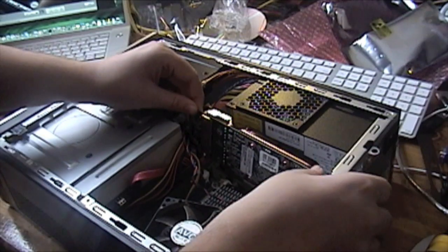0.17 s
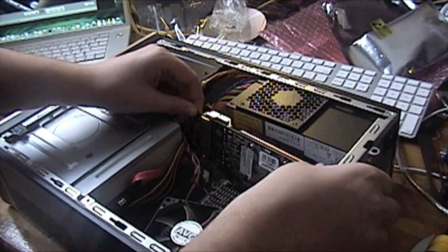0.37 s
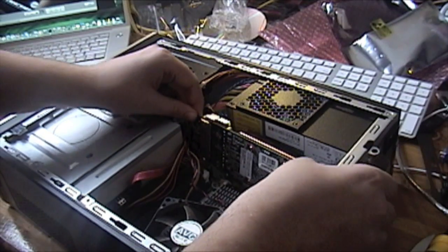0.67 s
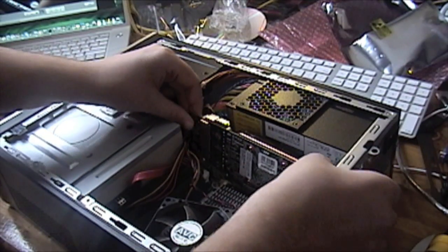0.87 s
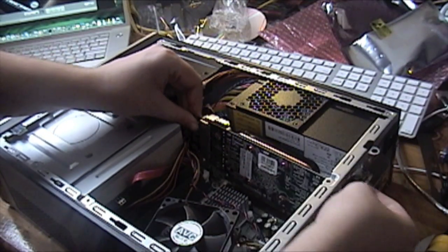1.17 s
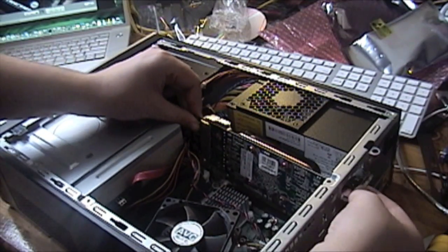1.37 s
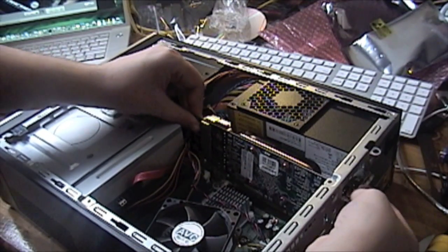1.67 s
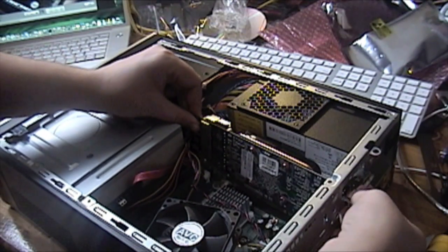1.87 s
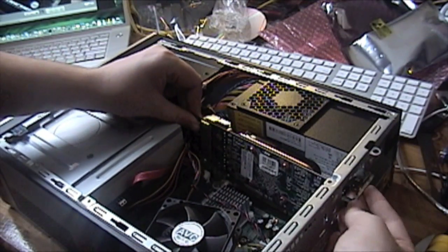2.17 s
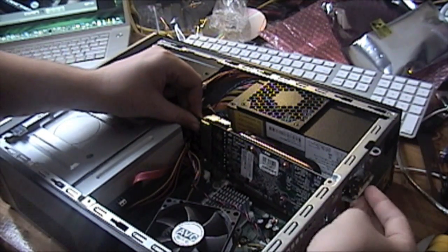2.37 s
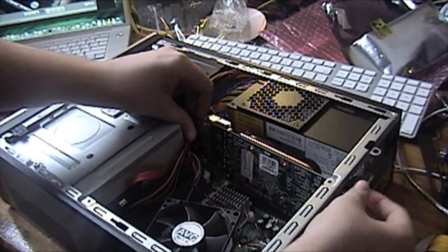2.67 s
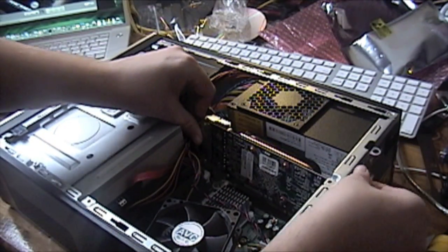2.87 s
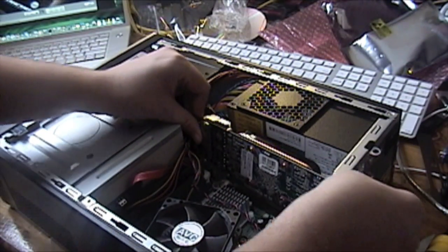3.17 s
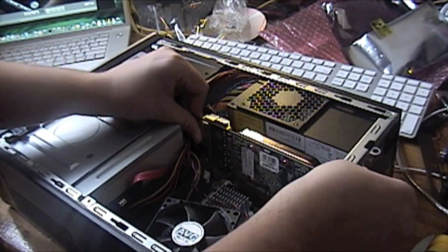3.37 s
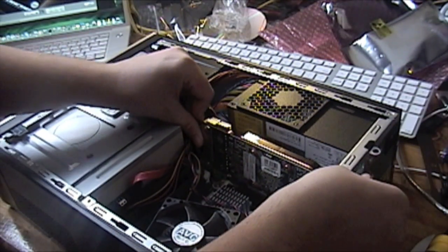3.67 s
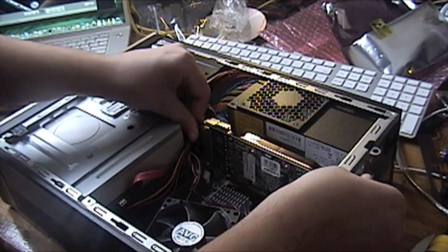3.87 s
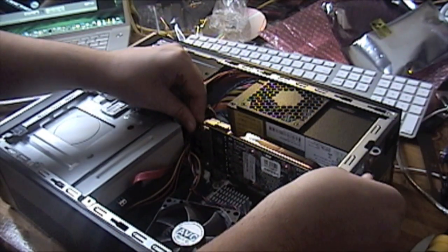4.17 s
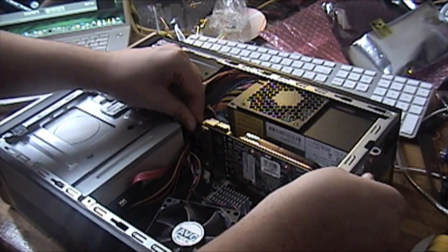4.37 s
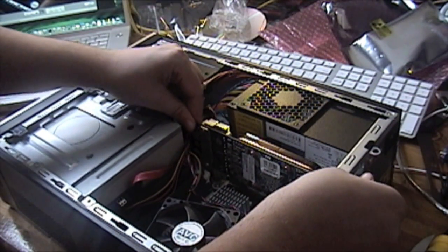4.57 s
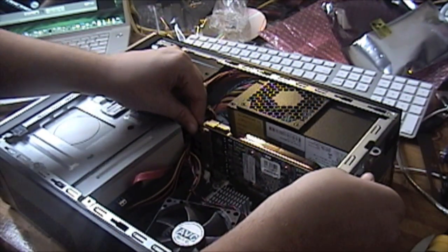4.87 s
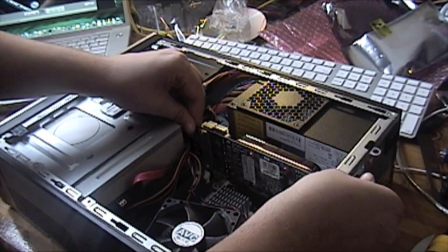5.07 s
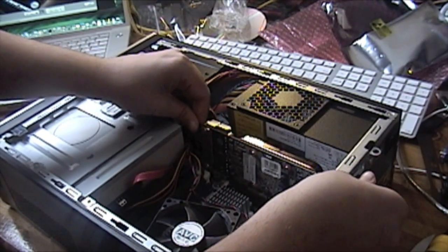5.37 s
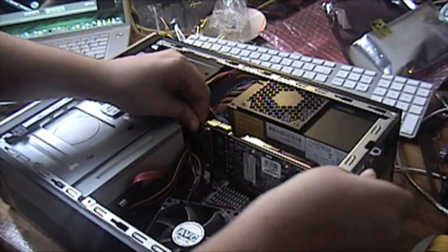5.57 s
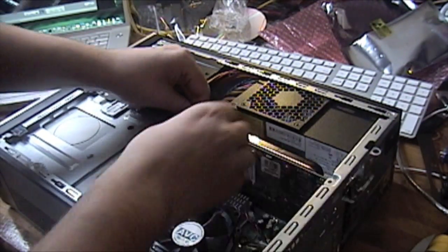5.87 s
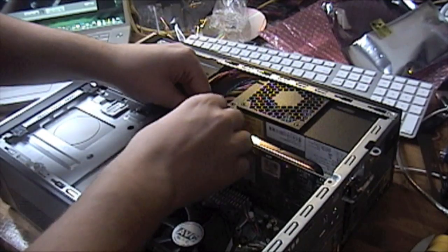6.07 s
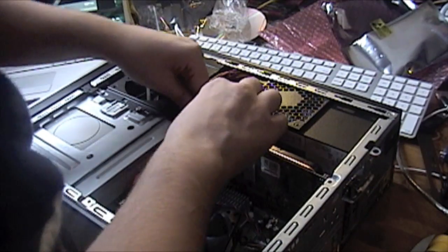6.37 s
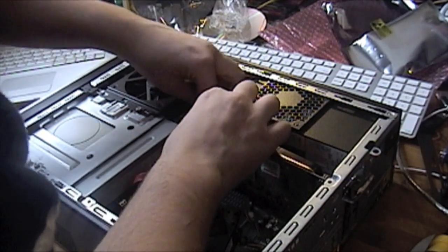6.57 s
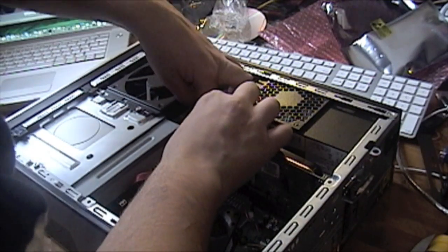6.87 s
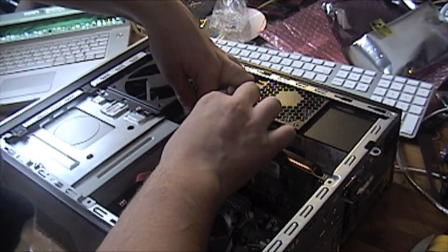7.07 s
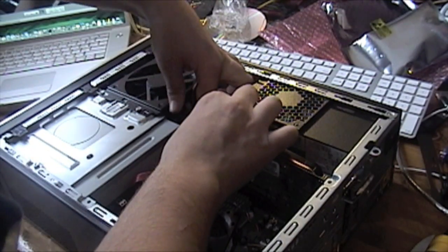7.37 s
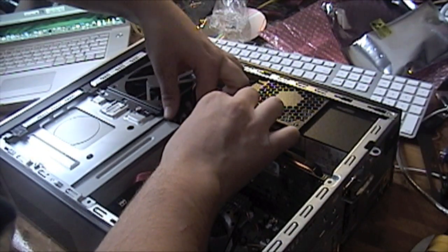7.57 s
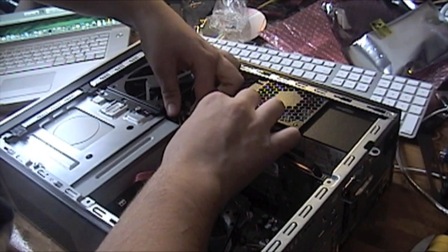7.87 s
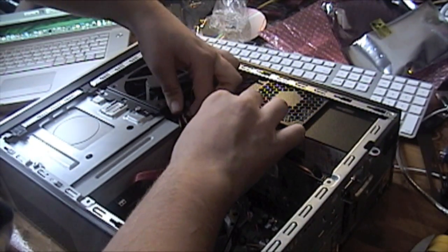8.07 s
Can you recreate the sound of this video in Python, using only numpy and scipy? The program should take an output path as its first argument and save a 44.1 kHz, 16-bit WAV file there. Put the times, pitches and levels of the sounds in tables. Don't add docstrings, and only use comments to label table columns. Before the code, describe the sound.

A low, slightly wavering ventilation drone with a soft fan tone, light hiss and a very thin high whine runs throughout, in a small room. Hands work close by in an open steel computer case. A crisp click and scrape come at 0.1 s, then sparse quiet ticks and short rubs, with a knock and low thud near 1.35 s and a scrape at 1.7 s. It is quieter from 2 to 3 s. A click at 3.0 s leads to the loudest moment, 3.25-3.4 s: hard, bright snaps and clanking steel, followed by smaller knocks and dull thuds until 3.9 s. Faint ticks fill 4-4.8 s. Scrapes and clicks resume from 4.9 to 5.7 s. From 6.1 to 6.8 s come firmer knocks, scrapes and hollow case thumps, then soft cable rubbing, a tick near 7.55 s, and a last light knock at 8.17 s.

```python
import sys
import numpy as np
from scipy import signal
from scipy.fft import rfft, irfft, next_fast_len
from scipy.io import wavfile
from scipy.ndimage import uniform_filter1d, map_coordinates

SR = 44100
rng = np.random.default_rng(int(sys.argv[2]) if len(sys.argv) > 2 else 0)


def decibels_to_gain(level_db):
    exponent = np.asarray(level_db, float) / 20
    return 10 ** exponent


def pcm_store(signal):
    levels = np.round(np.clip(np.atleast_2d(signal), -1, 1) * 32767)
    wavfile.write(sys.argv[1], SR, levels.astype(np.int16).T)


N = 362502

# freq_hz, density_db (per Hz)
AIR_SPECTRUM = [(15, -55.5), (25, -27), (134, -6.5), (217, -17.5), (427, -22), (503, -26.5), (560, -25),
                (1160, -29.5), (1610, -26), (7310, -39), (8140, -39), (9070, -39), (16000, -46.5)]
# freq_hz, width_hz, level_db
EDGE_MODES = [(5700, 3700, -5), (8740, 374, 4), (9250, 3500, -2.5), (13180, 4100, -6.5)]
# freq_hz, width_hz, level_db
PANEL_MODES = [(288, 52, 0), (450, 14.5, 4.5), (575.4, 22, 3.5), (680.5, 7.4, -1.5), (741, 3.8, -3.5),
               (870, 63, 2), (925, 355, -3.5), (1180, 120, -11.5), (1276, 46, -20)]
# freq_hz, width_hz, level_db
CARD_MODES = [(1890, 400, -8), (2030, 220, -6), (2670, 90, -12), (2880, 90, -6), (3330, 370, -7),
              (3540, 270, -15), (4710, 150, -10), (5650, 1500, -12)]


def unit(x):
    return x / np.sqrt(np.mean(x ** 2) + 1e-20)


def along(points, hz):
    f, v = np.transpose(points)
    return np.interp(np.log(hz + 1), np.log(f + 1), v)


def curves(rows):
    s, *cols = np.transpose(rows)
    return [np.interp(np.arange(N) / SR, s, c) for c in cols]


def filtered(x, response):
    m = next_fast_len(x.shape[-1] + 4096)
    spectrum = rfft(x, m) * response(np.fft.rfftfreq(m, 1 / SR))
    return irfft(spectrum, m)[..., :x.shape[-1]]


def resonant(modes, scatter_db=0):
    gains = decibels_to_gain(scatter_db * rng.standard_normal(len(modes)))

    def response(f):
        total = 0
        for k, (centre, width, db) in enumerate(modes):
            mode = 1j * f * width / (centre * centre - f * f + 1j * f * width)
            total = total + (-1) ** k * gains[k] * decibels_to_gain(db) * mode
        return total

    return response


def near(modes, hz, octaves):
    return [(c, w, db - 6 * (np.log2(c / hz) / octaves) ** 2) for c, w, db in modes]


def add(track, s, sound):
    part = track[:, round(s * SR):][:, :sound.shape[1]]
    part += sound[:, :part.shape[1]]


def rush(colour, patchy_db):
    # freq_hz, correlation (-1 to 1)
    likeness = [(60, 0.5), (130, 0.88), (290, 0.53), (640, -0.14), (1410, -0.49), (3100, -0.38),
                (6820, -0.13), (15000, 0.85)]
    z = signal.stft(rng.standard_normal((2, N)), nperseg=512)[2]
    patches = uniform_filter1d(rng.standard_normal(z.shape[1:]), 6, 0)
    patches = uniform_filter1d(patches, 14, 1)
    pair = signal.istft(z * decibels_to_gain(patchy_db * unit(patches)), nperseg=512)[1][:, :N]

    def mid_side(hz):
        angle = np.arccos(np.clip(along(likeness, hz), -1, 1)) / 2
        return colour(hz) * [np.cos(angle), np.sin(angle)]

    mid, side = filtered(pair, mid_side)
    return np.array([mid + side, mid - side])


def ventilation():
    # freq_hz, width_hz, level_db
    room_modes = [(36, 7, -24), (45, 5, -22), (59, 9.7, -3), (72, 2.7, -34), (83.8, 10, -6.5),
                  (115, 3.9, -0.5), (126.66, 3.2, 8.5), (141.8, 12.4, 4), (188, 10.8, -1), (269.7, 37, -10),
                  (313.5, 17.4, -2.5), (442, 140, -14.5)]
    # time_s, drone_db, air_db
    levels = [(0.0, -49, -56.5), (2.5, -50, -52.5), (2.7, -50, -56.5), (3.02, -49.5, -56),
              (3.75, -47.5, -56), (4.19, -49.5, -56.5), (7.05, -48.5, -54.5), (7.45, -51, -54),
              (7.62, -47.5, -54.5), (8.22, -48, -56.5)]
    drone_db, air_db = curves(levels)
    drone = unit(rush(resonant(room_modes), patchy_db=1.5))

    def low_band(hz):
        return decibels_to_gain(along(AIR_SPECTRUM, hz)) / (1 + (hz / 1500) ** 4) / (1 + (220 / (hz + 1)) ** 3)

    low_air = unit(rush(low_band, patchy_db=2.5))
    return decibels_to_gain(drone_db + 1.0) * drone + decibels_to_gain(air_db + 1.0) * low_air


def hiss():
    def high_band(hz):
        return decibels_to_gain(along(AIR_SPECTRUM, hz)) * (hz < 15900) / (1 + (1500 / (hz + 1)) ** 4)

    return decibels_to_gain(-62.5) * unit(rush(high_band, patchy_db=0.2))


def whine():
    # freq_hz, level_db (rms)
    tones = [(8000, -66.5), (11219, -91.5), (15735, -82)]
    t = np.arange(N) / SR
    return sum(decibels_to_gain(db) * np.sqrt(2) * np.sin(2 * np.pi * hz * t) for hz, db in tones)


def fan():
    # time_s, pitch_hz, level_db (rms)
    drift = [(0.0, 82.5, -57), (0.85, 83.9, -64.5), (7.53, 84, -56), (7.67, 81.3, -71), (8.22, 90, -75)]
    hz, db = curves(drift)
    return decibels_to_gain(db) * np.sqrt(2) * np.sin(2 * np.pi * np.cumsum(hz) / SR)


def rub():
    # time_s, rub_db, brightness_db
    strokes = [
        [(0.1, -65, -6), (0.352, -65.5, 2), (1.146, -75, -24), (1.95, -50, -37)],
        [(2.7, -57.5, -8), (3.06, -60.5, -9), (3.17, -60, 4), (3.5, -66, -3)],
        [(3.35, -66, -6), (3.39, -39, -39), (3.98, -102, -18)],
        [(4.8, -71, -4), (5.03, -84.5, -14.5), (6.05, -79.5, 5), (6.55, -60, -6), (6.9, -57, -9),
         (7.05, -61.5, -11), (7.35, -56, -4)],
        [(7.72, -62, -23), (7.86, -69, -21), (8.0, -74, -24)],
    ]
    level, bright = np.zeros((2, N))
    s = np.arange(N) / SR
    for rows in strokes:
        db, bright_db = curves(rows)
        on = np.clip(np.minimum(s - rows[0][0], rows[-1][0] - s) / 0.16, 0, 1)
        level += on * decibels_to_gain(db - 5)
        bright += on * decibels_to_gain(db + bright_db - 5)
    knots = rng.standard_normal(N // 1500 + 4)
    clumps = decibels_to_gain(3 * map_coordinates(knots, [np.arange(N) / 1500]))
    slips = rng.standard_normal((2, N)) * decibels_to_gain(2.2 * rng.exponential(size=N)) * clumps
    dull_modes = [(900, 2300, 7.5), (1370, 165, 14.0), (2900, 860, -3.0)]  # Hz, width Hz, dB
    dull = unit(filtered(slips, resonant(dull_modes)))
    sharp = unit(filtered(slips, resonant(EDGE_MODES)))
    sound = level * dull + bright * sharp
    return sound[0] + 0.45 * np.outer([1, -1], sound[1])


def body(force, db, casing_db, sparkle_db, card, casing, card_top_hz):
    # modes, top Hz, level dB, stereo spread
    parts = [(card, card_top_hz, db, .4),
             (casing, 1500, db + casing_db, .12),
             (EDGE_MODES, 16000, db + sparkle_db + 6.0, .4)]
    sound = 0
    for modes, top_hz, level_db, spread in parts:
        ring = resonant(modes, scatter_db=2.5)
        part = filtered(force, lambda f: ring(f) / (1 + 1j * f / top_hz) ** 2)
        part = part * decibels_to_gain(level_db) / np.abs(part[0]).max()
        sound = sound + part[0] + spread * np.outer([1, -1], part[1])
    return sound


def scrapes():
    # start_s, peak_db, sparkle_db, length_s
    edge_drags = [(0.302, -40.5, -12, 0.027), (0.795, -44, -9, 0.073), (0.969, -38.5, -3.5, 0.086),
                  (1.703, -31.5, -18, 0.056), (2.541, -37.5, -13, 0.1), (2.607, -43, -10, 0.061),
                  (2.761, -51, 0, 0.038), (3.309, -12, -17, 0.023), (3.714, -37.5, -20, 0.051),
                  (5.056, -25.5, -23, 0.072), (5.132, -53, 11, 0.012), (6.203, -35, -9, 0.036),
                  (6.227, -41, -7, 0.055), (6.379, -39, 1.5, 0.037), (6.515, -35, -12.5, 0.095),
                  (6.654, -35, -14, 0.088), (6.776, -26, -18, 0.089), (7.269, -30.5, -7.5, 0.029)]
    # start_s, peak_db, panel_pitch_hz, length_s
    presses = [(.589, -52.5, 555, 0.055), (1.3696, -44.5, 460, 0.016), (3.346, -30.5, 394, 0.029),
               (3.76, -42, 276, 0.028), (3.825, -55.5, 1480, 0.12), (4.948, -45, 870, 0.045),
               (5.26, -55, 470, 0.026), (5.365, -47, 800, 0.037), (5.967, -49, 454, 0.017),
               (6.4594, -54, 600, 0.018), (6.985, -51, 450, 0.068), (7.059, -51, 595, 0.022),
               (7.198, -51.5, 426, 0.06)]
    # start_s, peak_db, panel_pitch_hz, length_s
    dull_drags = [(.1322, -20.5, 1370, 0.024), (.4694, -41.5, 486, 0.046), (.685, -43, 301, 0.071),
                  (1.4956, -38.5, 305, 0.1), (1.8774, -36.5, 596, 0.076), (3.2814, -21.5, 702, 0.05),
                  (3.328, -12, 900, 0.026), (3.5235, -32.5, 410, 0.032), (4.8894, -43, 877, 0.038),
                  (5.0345, -36.5, 840, 0.096), (5.317, -30.5, 887, 0.09), (5.477, -28.5, 250.6, 0.03),
                  (5.6569, -31, 900, 0.058), (6.3377, -32.5, 958, 0.043), (6.566, -29, 694, 0.062),
                  (6.616, -30, 700, 0.038), (6.805, -29.5, 630, 0.035), (7.1072, -38.5, 467, 0.079)]
    # start_s, peak_db, panel_pitch_hz, length_s
    bright_drags = [(.185, -37.5, 288, 0.069), (.261, -45, 443, 0.043), (.748, -43.5, 586, 0.033),
                    (1.835, -37, 574, 0.084), (4.282, -41, 332, 0.062), (4.3294, -42, 354, 0.062),
                    (7.5025, -43.5, 440, 0.059), (7.727, -37, 418, 0.019), (8.1658, -35, 465, 0.039),
                    (4.115, -48, 900, 0.044), (6.975, -40, 900, 0.05), (7.095, -45.5, 900, 0.035)]
    edge_casing_db, edge_panel_hz = -14.5, 1100
    drags = [(s, db, edge_casing_db, sparkle_db, edge_panel_hz, length)
             for s, db, sparkle_db, length in edge_drags]
    # drags, casing dB, sparkle dB
    for rows, casing_db, sparkle_db in [(presses, 16.7, -15), (dull_drags, 0.82, -33),
                                        (bright_drags, 3.6, -17.5)]:
        drags += [(s, db, casing_db, sparkle_db, hz, length) for s, db, hz, length in rows]
    track, t = np.zeros((2, N)), np.arange(SR // 5) / SR
    card = CARD_MODES + [(2480, 10300, -0.26)]
    for s, db, casing_db, sparkle_db, hz, length in drags:
        u = t / max(length, .005) * 3
        slips = decibels_to_gain(2.98 * rng.exponential(size=len(t)))
        stroke = u * np.exp(-u * u / 2)
        force = rng.standard_normal((2, len(t))) * slips * stroke
        casing = near(PANEL_MODES, hz, octaves=0.69) + [(hz * 0.98, hz * 1.52, -8)]
        sound = body(force, db - 7.0, casing_db - 0.5, sparkle_db + 1.5, card, casing, card_top_hz=5370)
        add(track, s, sound)
    return track


def clicks():
    # start_s, peak_db, card_pitch_hz, sparkle_db, decay_t60_s
    rattles = [(0.1331, -22.5, 4090, -2.5, 0.041), (0.2021, -36, 1950, -6, 0.049),
               (1.3662, -29.5, 1300, -22, 0.064), (3.009, -27.5, 2790, -9, 0.056),
               (3.277, -5, 6600, -3, 0.042), (3.309, -9, 4500, -3, 0.068), (3.3408, -16, 1944, -6.5, 0.047),
               (3.368, -26, 3070, -6.5, 0.028), (3.5389, -29.5, 2280, -26.5, 0.05),
               (5.040, -38, 2374, -23.5, 0.046), (5.0664, -30, 2130, -15, 0.08),
               (5.3545, -31, 2170, -14.5, 0.085), (5.487, -37, 2100, -10, 0.025),
               (5.6517, -37, 2200, -15, 0.11), (5.676, -38, 1932, -41, 0.049),
               (6.387, -31.5, 4277, -12, 0.05), (6.5668, -34.5, 1097, -19, 0.041),
               (7.740, -37, 4330, -25, 0.035), (8.169, -48, 2250, -23, 0.034)]
    # start_s, peak_db, card_pitch_hz, sparkle_db
    dry_ticks = [(0.3108, -39, 6670, -9), (0.85, -30, 5800, -22), (0.935, -46, 3360, -9),
                 (1.334, -28.5, 3860, -11), (1.6145, -39.5, 1700, -29), (1.72, -41, 4200, -7),
                 (1.889, -35.5, 5700, 1.5), (2.458, -45, 2200, -12), (3.523, -36, 5500, -13),
                 (4.3438, -42.5, 3420, -10), (4.9395, -40, 1850, -25), (4.9912, -32.5, 4730, -10),
                 (5.0915, -23.5, 2900, -10.5), (5.3248, -34, 2660, -32), (5.97, -48, 1900, -4),
                 (6.1172, -36.5, 3360, -9), (6.1648, -38, 6400, -8), (6.228, -31, 3060, -5),
                 (6.3302, -23, 1370, -17), (6.6255, -23, 1820, -20), (7.1175, -43, 1720, -6),
                 (7.4966, -44, 2900, -9), (7.558, -28, 5650, -10.5), (7.6507, -39, 2780, -22),
                 (7.7252, -38.5, 6160, 1), (3.6, -51, 5000, -12), (3.911, -50, 2200, -8),
                 (7.2, -43, 5300, -14), (1.47, -46, 5000, -12), (4.305, -54, 2500, -1.5),
                 (4.362, -54, 6000, -2), (4.589, -48, 5700, -3), (6.238, -42, 9550, 0),
                 (6.46, -46, 3000, -20), (7.177, -49, 6500, -3), (7.025, -52, 8950, -2)]
    tick_t60_s, tick_grows = 0.018, 0.9
    shake_db, shake_db_per_octave = -7, -6.5
    ticks = [(s, db, hz, sparkle_db, tick_t60_s * (hz / 2000) ** tick_grows)
             for s, db, hz, sparkle_db in dry_ticks]
    track, t = np.zeros((2, N)), np.arange(SR // 6) / SR
    casing = PANEL_MODES + [(800, 640, -5.5)]
    for s, db, hz, sparkle_db, t60 in ticks + rattles:
        casing_db = shake_db + shake_db_per_octave * np.log2(hz / 2000)
        fade = decibels_to_gain(-60 * t / t60) + decibels_to_gain(-60 * t / 0.0074)
        force = rng.standard_normal((2, len(t))) * fade * (1 - np.exp(-t / .0003))
        card = near(CARD_MODES, hz, octaves=0.9) + [(hz, hz * 0.11, -7), (hz * 1.01, hz * 0.54, -5)]
        add(track, s, body(force, db - 3.5, casing_db, sparkle_db + 3.0, card, casing, hz * 2.0))
    return track


def pings():
    # start_s, peak_db, pitch_hz, decay_t60_s
    free_parts = [(0.135, -36, 1180, 0.17), (.145, -40.5, 465, 0.14), (.475, -49, 1290, 0.057),
                  (.850, -38.5, 1930, 0.0092), (1.541, -46.5, 2050, 0.029), (1.773, -52, 3400, 0.019),
                  (3.311, -27, 3200, 0.04), (3.759, -35, 1880, 0.023), (3.761, -38.5, 854, .05),
                  (3.78, -41, 900, 0.048), (3.778, -44, 1900, .012), (4.591, -43, 11030, 0.024),
                  (4.955, -51, 870, 0.049), (5.068, -39.5, 2040, 0.048), (5.362, -36, 2000, 0.066),
                  (5.375, -33.5, 870, 0.056), (5.492, -39, 900, 0.031), (6.574, -40.5, 3040, 0.2),
                  (6.626, -33, 990, 0.11), (7.21, -41, 450, 0.082), (8.174, -59, 450, 0.038)]
    # start_s, peak_db, pitch_hz, decay_t60_s
    held_parts = [(1.27, -47, 800, 0.19), (1.334, -43, 1190, 0.045), (1.369, -34, 600, 0.041),
                  (3.279, -25, 2000, .05), (3.341, -19, 480, 0.061), (3.339, -19.5, 1060, 0.09),
                  (5.093, -26, 5000, 0.034), (6.33, -21, 1890, 0.022), (6.335, -36, 1500, 0.083),
                  (6.34, -37, 610, 0.17), (6.620, -34, 1800, 0.1), (5.326, -36.5, 800, 0.037),
                  (3.2779, -17, 6400, 0.026), (3.278, -8, 10300, .03), (3.310, -15, 6300, .04),
                  (3.331, -26, 770, 0.064), (3.362, -21.5, 610, 0.042), (6.626, -23.5, 1880, 0.017),
                  (6.634, -36.5, 1700, 0.12), (5.484, -46, 2510, 0.033), (7.061, -43, 700, 0.024),
                  (0.85, -43, 1100, .04), (1.845, -42, 1370, .08), (1.893, -40, 1890, .04),
                  (3.012, -36, 2600, 0.065), (3.025, -36, 1630, 0.093), (3.04, -42, 2800, .04),
                  (3.526, -38, 3400, .04), (3.836, -47, 1280, .05), (6.8, -44, 8000, .06),
                  (4.89, -48, 2000, .04), (4.96, -50, 1700, .06), (5.255, -49, 750, 0.11),
                  (6.388, -49, 2500, .05), (7.56, -43.5, 1600, 0.044), (7.502, -49, 1200, .04),
                  (8.166, -46, 2200, 0.025), (8.19, -50, 1800, .04)]
    # start_s, peak_db, pitch_hz, decay_t60_s
    clean_steel = [(2.62, -50.5, 5580, 0.076), (2.765, -59, 5700, 0.072), (3.279, -40, 4500, 0.097),
                   (3.28, -35, 2900, .04), (3.278, -44, 870, 0.046), (3.312, -16, 4560, 0.073),
                   (3.311, -23, 2780, 0.058), (3.33, -34, 870, 0.052), (3.34, -28, 2910, 0.04),
                   (3.342, -29, 2005, 0.049), (3.348, -26, 453, 0.066), (3.312, -19.5, 3330, 0.061),
                   (5.04, -43, 900, .05), (6.332, -40.5, 1020, 0.048), (6.334, -45, 2470, 0.065),
                   (6.581, -50, 2000, 0.095), (6.585, -48, 10200, 0.055), (6.627, -45.5, 668, 0.14),
                   (6.626, -43, 1330, 0.13), (6.68, -53, 11900, .06), (6.7, -54, 10940, 0.087),
                   (7.023, -58, 12100, 0.031), (7.175, -58, 7050, .03), (7.08, -55, 3230, 0.059),
                   (7.978, -49, 315, 0.046), (1.722, -52, 1310, 0.25), (1.72, -50, 856, .08),
                   (1.771, -46, 790, .05), (1.865, -51, 2130, .04), (1.941, -51.5, 1300, 0.067),
                   (3.525, -44, 5500, .05), (5.067, -38, 2680, .06), (5.35, -50, 5400, .06),
                   (5.36, -45, 3500, 0.051), (6.79, -44, 2500, 0.089), (6.79, -49, 1970, .07),
                   (7.272, -52, 1970, 0.084), (7.272, -48, 4670, .05), (4.918, -57, 3400, .03),
                   (5.19, -60.5, 2550, .08), (.86, -47, 5950, 0.063), (6.228, -33, 8640, 0.033),
                   (.134, -38, 920, 0.092), (.134, -28, 11400, .04), (8.172, -43.5, 521, 0.087),
                   (6.8, -43, 4000, 0.066), (6.8, -46, 3200, .06), (6.645, -47, 2100, .07)]
    track, t = np.zeros((2, N)), np.arange(SR // 4) / SR
    for rows, damping in [(free_parts, 0.14), (held_parts, 0.77), (clean_steel, 0.091)]:
        for s, db, hz, t60 in rows:
            force = rng.standard_normal((2, len(t))) * decibels_to_gain(-60 * t / t60) * (1 - np.exp(-t / 0.00032))
            force[0, 0] = 9
            mode = resonant([(hz, hz * damping, 0)])
            ring = filtered(force, lambda f: mode(f) ** 2)
            sound = ring[0] + 0.24 * np.outer([1, -1], ring[1])
            add(track, s, decibels_to_gain(db) * sound / np.abs(ring[0]).max())
    return track


def thumps():
    # start_s, peak_db, pitch_hz, decay_t60_s
    shifts = [(1.371, -34, 136, 0.23), (3.279, -32, 35, 0.14), (3.336, -25.5, 255, 0.11),
              (3.35, -23, 292, 0.089), (5.119, -39, 204, 0.078), (2.075, -39, 89.5, 0.21),
              (3.604, -34, 127, .15), (6.716, -33, 138.6, .12), (3.765, -34, 194, 0.1),
              (3.777, -20.5, 188, 0.033), (3.793, -23, 204, 0.028), (5.093, -41, 135, 0.39),
              (5.495, -32, 149, 0.17), (5.7, -46, 49.6, 0.29), (5.97, -42, 210, 0.11),
              (6.379, -27.5, 141, 0.08), (6.45, -40.5, 45, 0.58), (6.532, -28.5, 123, 0.073),
              (7.9, -53, 42.7, 0.19), (8.172, -37.5, 210, 0.12)]
    track, t = np.zeros((2, N)), np.arange(SR // 2) / SR
    for s, db, hz, t60 in shifts:
        onset = 1 - np.exp(-t * hz / 0.77)
        push = np.sin(2 * np.pi * hz * t) * decibels_to_gain(db - 60 * t / t60) * onset
        add(track, s, np.outer([1 + 22 / hz, 1 - 22 / hz], push))
    return track


def room(x):
    # freq_hz, decay_t60_s
    decay = [(200, 0.47), (1000, 0.26), (4000, 0.23), (12000, 0.11)]
    hz, t, z = signal.stft(rng.standard_normal((2, SR // 2)), SR, nperseg=256)
    fade = decibels_to_gain(-60 * t / along(decay, hz)[:, None])
    mid, side = signal.istft(z * fade, SR, nperseg=256)[1]
    tail = mid + .5 * np.outer([1, -1], side)
    delayed = np.pad(x, (200, 0))[None]
    return signal.fftconvolve(delayed, tail / np.linalg.norm(tail[0]), axes=1)[:, :N]


def scene():
    background = ventilation() + hiss() + whine() + fan()
    hands = rub() + scrapes() + clicks() + pings()
    echo = decibels_to_gain(-10.0) * room(hands.mean(axis=0))
    return background + hands + echo + thumps()


def top_cut(x):
    return signal.sosfilt(signal.butter(12, 16830, fs=SR, output="sos"), x)


def record(dry):
    limited = filtered(dry, lambda hz: 1 / (1 + (hz / 16000) ** 70))
    return top_cut(limited)


dry = scene()
out = record(dry)
pcm_store(out)
```